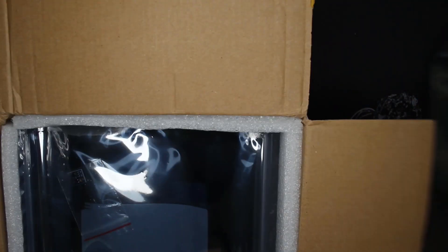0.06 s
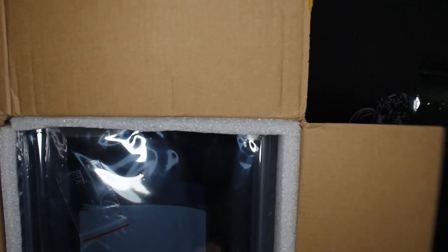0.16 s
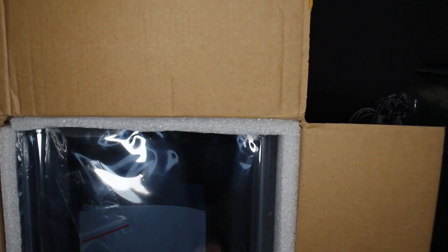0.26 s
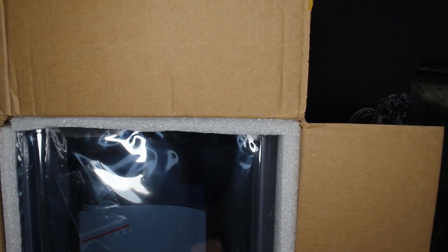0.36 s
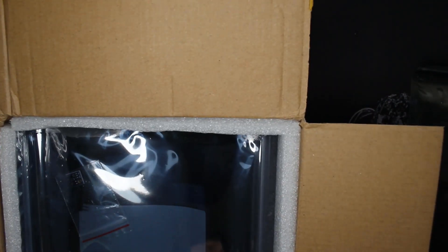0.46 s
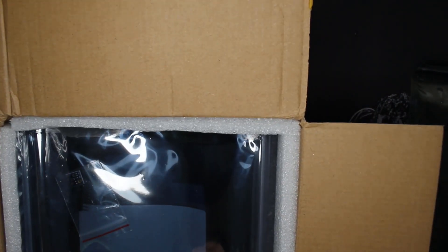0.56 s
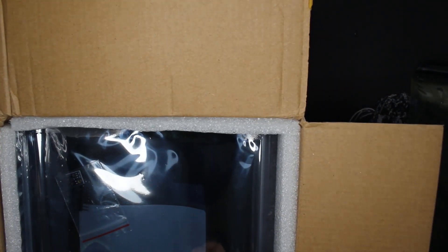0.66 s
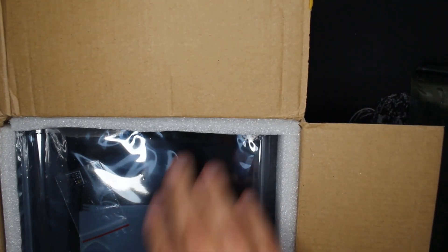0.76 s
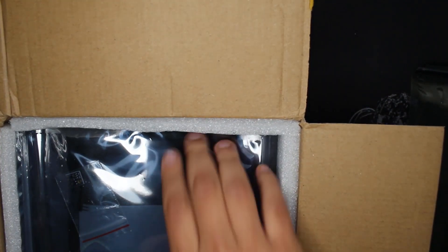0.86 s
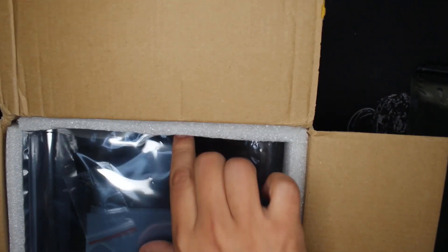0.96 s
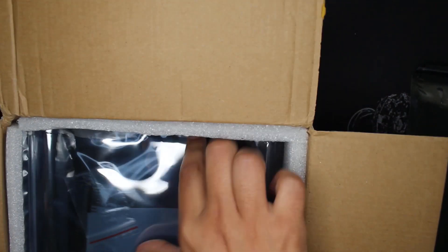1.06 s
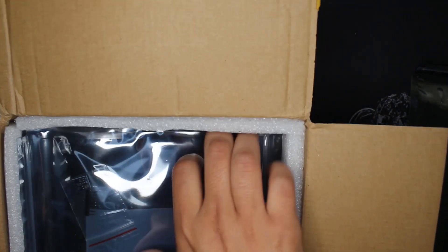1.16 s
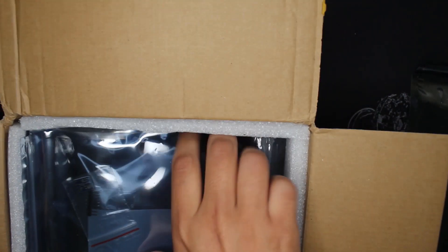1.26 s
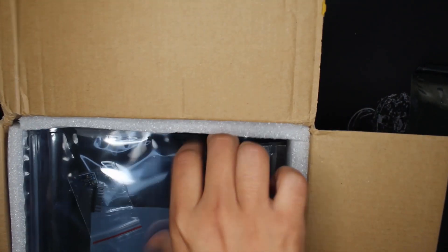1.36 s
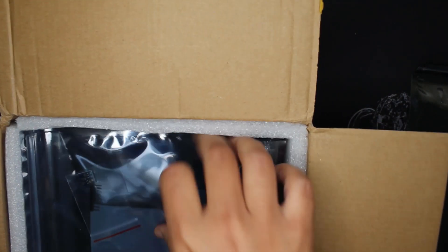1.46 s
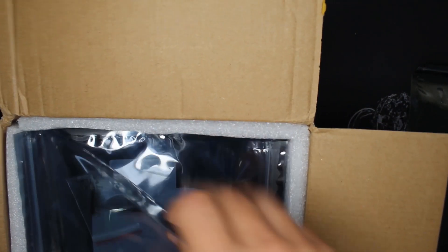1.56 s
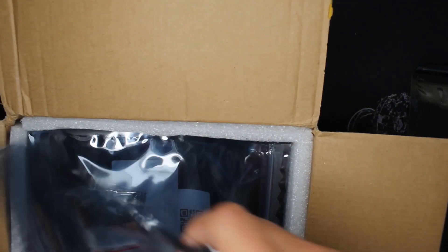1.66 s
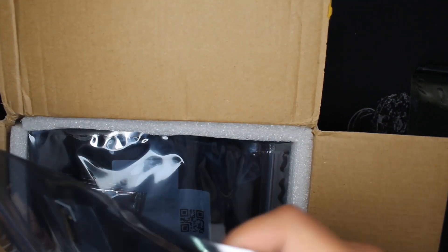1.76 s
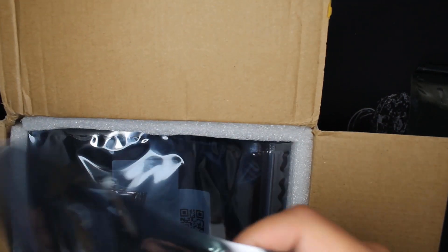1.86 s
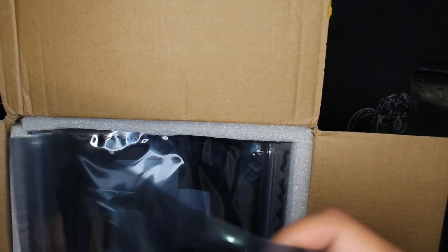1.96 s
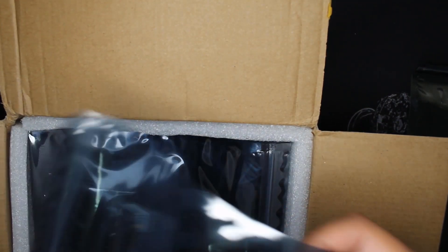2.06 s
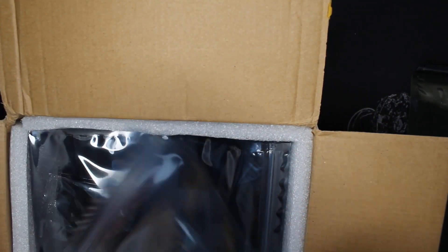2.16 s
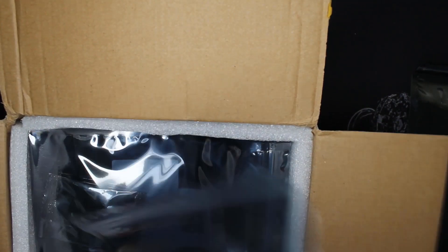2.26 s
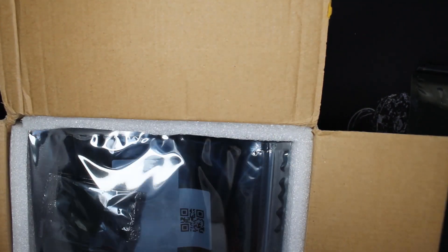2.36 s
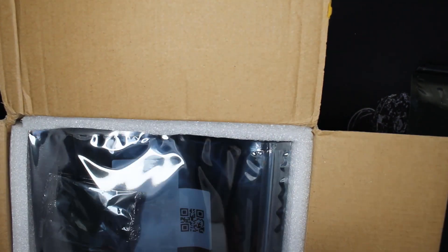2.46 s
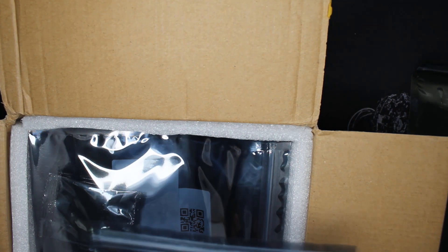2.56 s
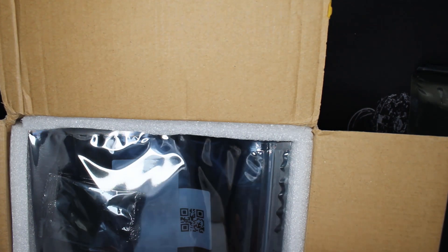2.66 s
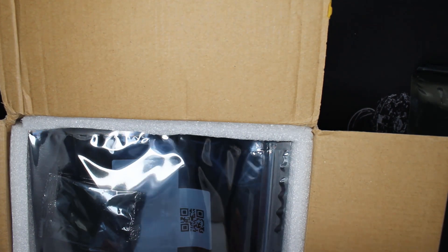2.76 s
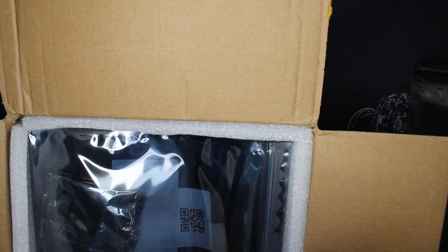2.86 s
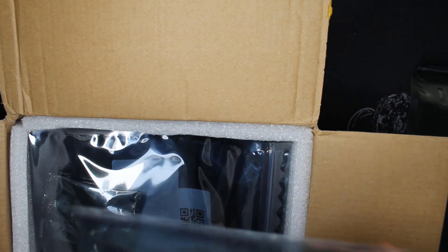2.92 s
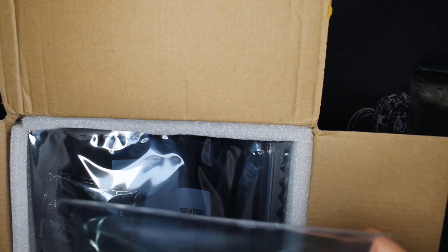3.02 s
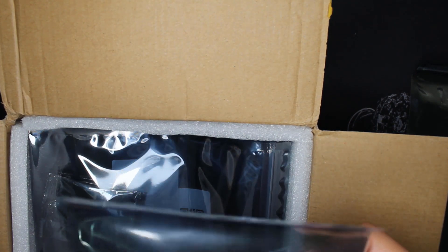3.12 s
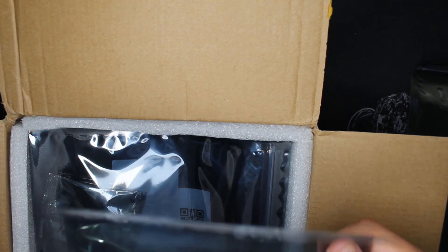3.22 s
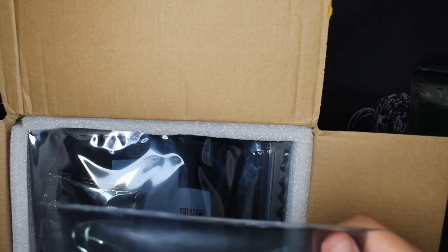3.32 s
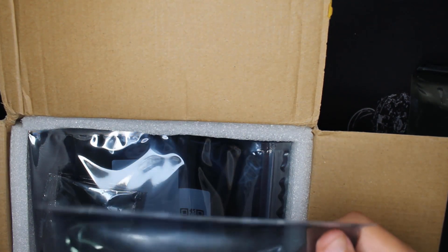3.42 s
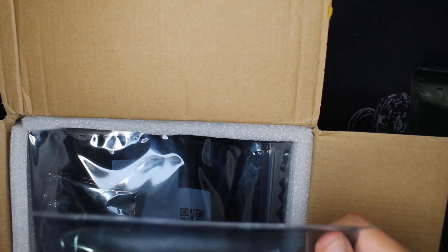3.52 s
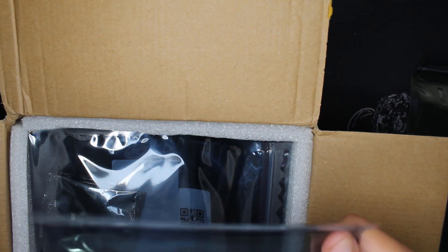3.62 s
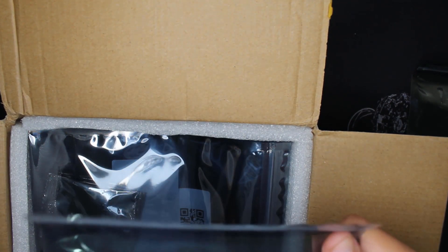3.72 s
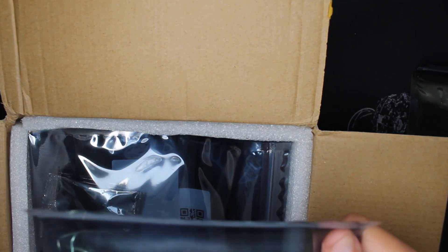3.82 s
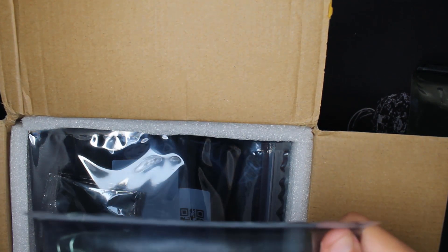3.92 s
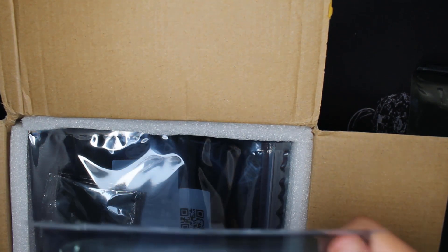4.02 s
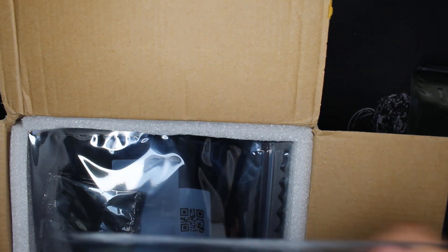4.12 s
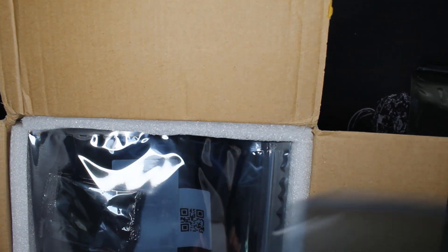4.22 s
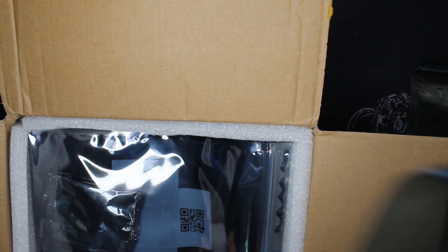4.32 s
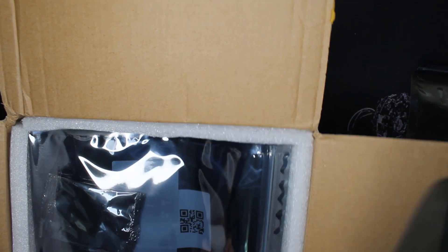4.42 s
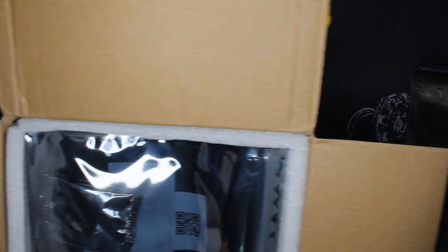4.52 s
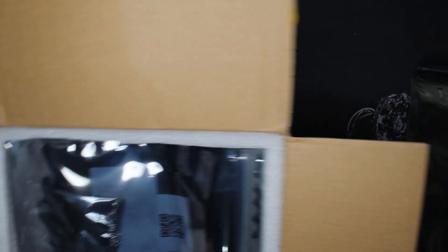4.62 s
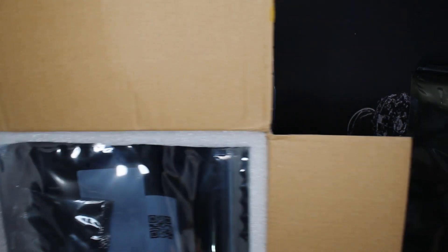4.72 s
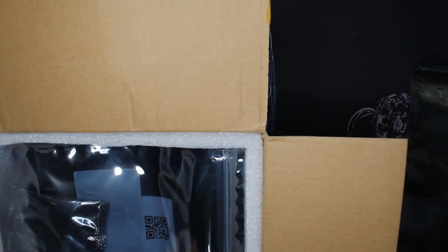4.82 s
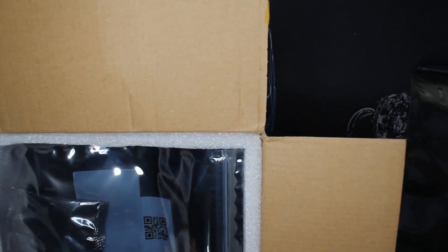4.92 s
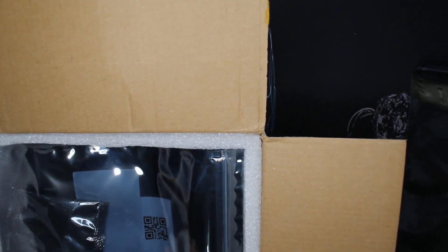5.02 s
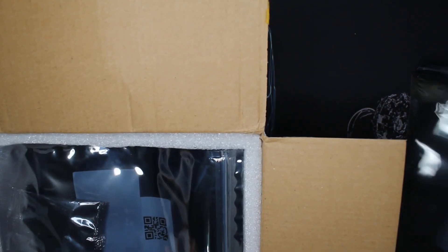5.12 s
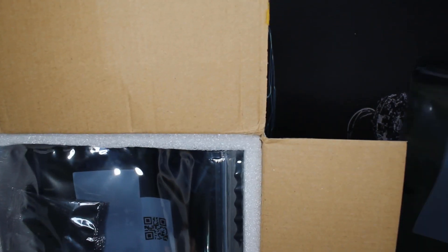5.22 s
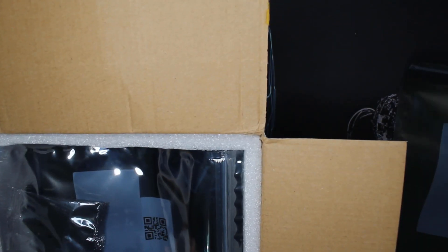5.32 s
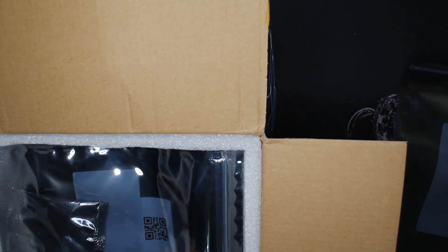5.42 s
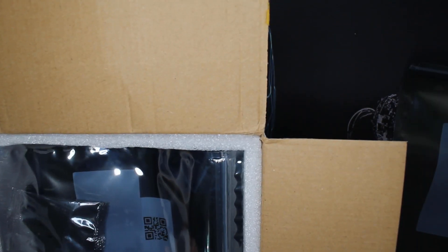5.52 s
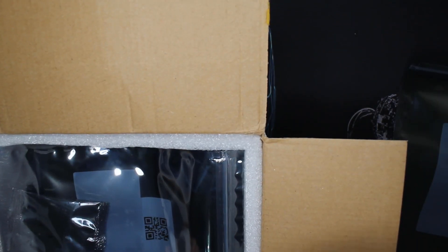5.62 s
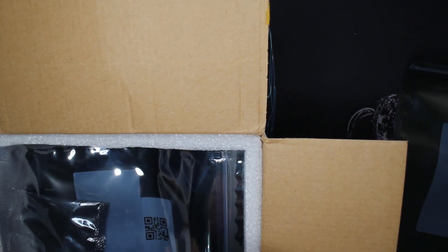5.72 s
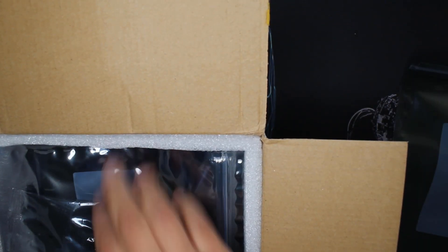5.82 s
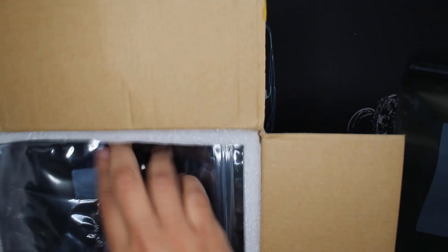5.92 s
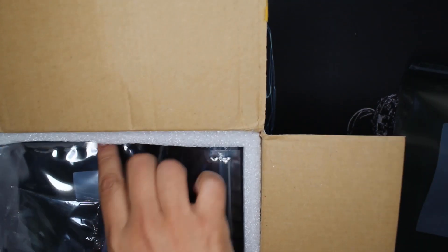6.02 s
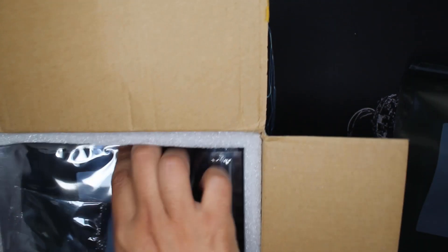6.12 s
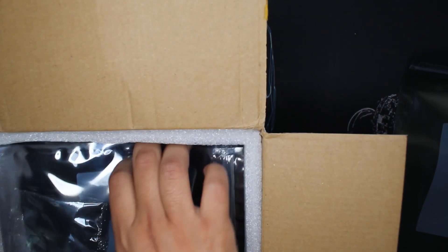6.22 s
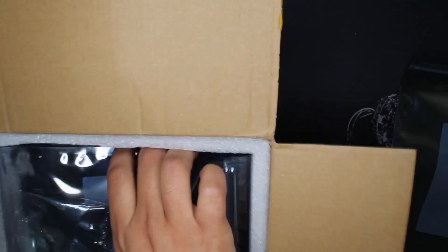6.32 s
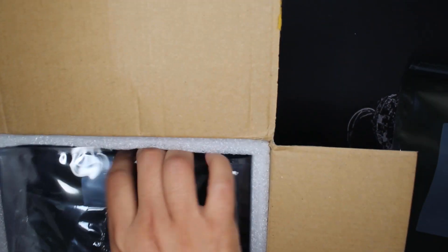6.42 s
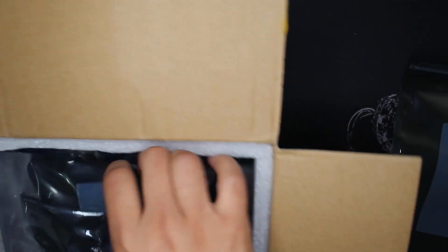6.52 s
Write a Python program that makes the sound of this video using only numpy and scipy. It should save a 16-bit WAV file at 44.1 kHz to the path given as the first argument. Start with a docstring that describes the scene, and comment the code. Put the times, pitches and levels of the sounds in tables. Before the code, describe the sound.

Stiff plastic bags crackle and rustle up close as they are gripped and lifted out of a cardboard box. The crinkling is busiest early, then drops to scattered ticks. The box shifts once over the table with a soft, slightly squeaky scrape before another flurry of crisp crinkles. Low handling thumps reach the microphone through the table, over the faint tone of a small room.

```python
"""Foil bags in a cardboard box

A hand pulls stiff foil-plastic bags out of a foam-lined box, close to the microphone in a small room.
Each crease snaps with one brief click, followed by a quick cluster of echoes from the box walls.
The film rustles and rings; the box booms softly and slides once over the table, hissing and squeaking.
Bumps travel through the table and reach the microphone as low rumble above a quiet room tone."""
import sys
import numpy as np
from scipy import signal
from scipy.fft import rfft, irfft, next_fast_len
from scipy.io import wavfile

SR = 44100
rng = np.random.default_rng(int(sys.argv[2]) if len(sys.argv) > 2 else 0)


def dump_mix(stems):
    """Bounce the given channels to the path in sys.argv[1] as a 16-bit WAV at rate SR."""
    frames = np.atleast_2d(stems).T  # one column per channel
    limited = np.clip(frames, -1, 1)  # hard clip at full scale
    pcm = np.round(limited * 32767).astype(np.int16)
    wavfile.write(sys.argv[1], SR, pcm)


N = 290178
T = np.arange(N) / SR

# snapping creases: (time [s], knock on the box [dB], film crack [dB], bright tick [dB], panel ring [Hz])
SNAPS = [(.0168, -28, -25, -50, 3080), (0.0331, -7, -15, -17.5, 4700), (0.042, -45, -7, -12, 1400),
         (0.0885, -14, -10.5, -27, 4810), (0.1208, -16.5, -13, -31, 3820), (0.2417, -40, -17.5, -52, 2400),
         (.4348, -51, -46, -35, 6900), (0.8365, -15, -18, -18, 6130), (.862, -19, -22.5, -40, 3250),
         (0.8999, -5.5, -17.5, -7, 7500), (0.9819, -19, -19.5, -37, 1670), (1.0123, -21, -25.5, -32, 6050),
         (1.0252, -46, -30, -25, 7900), (1.0531, -20.5, -26, -27, 5550), (1.1548, -22, -15, -17.5, 2440),
         (1.1884, -16, -9, -19, 2940), (1.2032, -18, -12, -28, 1700), (1.2692, -26, -34, -20, 6490),
         (1.3269, -10, -10, -13.5, 7800), (1.3961, -22, -6.5, -5, 6840), (1.424, -34, -11.5, -9, 6900),
         (1.4461, -10.5, -28, -7, 4500), (1.4548, -35, -29, -15, 6400), (1.4993, -16, -3, -16, 1700),
         (1.52, -31, -10, -21, 2920), (1.57, -21, -9.5, -8, 6100), (1.5817, -12, -25, -20, 2070),
         (1.6046, -20, -3, -10, 5570), (1.6288, -38, -24, -12, 3800), (1.636, -21, -10.5, -7, 4460),
         (1.7753, -32, -11.5, -16, 6500), (1.8479, -25, -42, -47, 4480), (1.9718, -15, -8, -10, 7500),
         (2.1621, -27.5, -31, -28.5, 1040), (2.2869, -37, -17, -29, 5400), (2.308, -17.5, -16.5, -26, 3540),
         (2.434, -24, -30, -56, 5130), (2.498, -30, -28.5, -54, 4290), (2.522, -33, -29, -52, 1750),
         (2.5698, -30.5, -5, -15.5, 7700), (2.592, -28, -18.5, -27, 2950), (2.689, -29, -30, -53, 1600),
         (2.7134, -33, -32, -34, 800), (2.74, -17.5, -3, 4.5, 7460), (2.868, -26, -19, -39, 3000),
         (3.0216, -23.5, -18, -22, 6900), (3.1017, -24, -24.5, -47, 900), (3.5726, -37, -32, -43.5, 936),
         (3.859, -18, -19, -48, 3200), (4.0019, -22.5, -21.5, -36.5, 970), (4.0088, -25, -30, -29.5, 2290),
         (4.2692, -33, -36.5, -41, 1400), (4.781, -40, -35, -50, 2700), (4.7884, -45, -35, -46, 5440),
         (4.9042, -47.5, -37.5, -62, 3120), (4.946, -53.5, -37.5, -51, 3230),
         (5.0555, -27.5, -25.5, -29.5, 1120), (5.0682, -27.5, -27, -31.5, 1420),
         (5.0985, -20, -19, -28, 2700), (5.1036, -19.5, -13.5, -12.5, 7350), (5.1169, -37, -11, -32, 2460),
         (5.2381, -34, -44, -33, 8160), (5.2784, -36, -37.5, -38.5, 7000), (5.4433, -31, -25, -21, 5390),
         (5.8348, -29.5, -36, -31, 6950), (5.8415, -33, -28.5, -28, 6970), (5.9173, -18, -16, -6.5, 11300),
         (6.0228, -32, -33, -37, 7080), (6.0484, -26, -25, -41, 5470), (6.334, -42, -27, -25, 6340),
         (6.3556, -4, -15.5, -13.5, 796), (6.4008, -18, -15, -21, 6150), (6.4676, -44, -26, -27, 6840),
         (6.5201, -7, -24, -25, 5170), (6.5269, -22, -14, -12.5, 6270), (6.5385, -24, -11.5, -14, 6640)]
# handling bumps: (time [s], level [dB], direction [push +1, pull -1], width [s])
BUMPS = [(0.038, -42, 1, 0.0049), (.72, -41, 1, 0.02), (0.831, -41, -1, 0.012), (0.923, -29.5, 1, 0.0059),
         (1.091, -41, 1, 0.0031), (1.197, -29, -1, 0.0048), (1.357, -34, 1, 0.0066),
         (1.404, -33, 1, 0.0026), (1.452, -35, -1, 0.0024), (1.506, -16.5, -1, 0.0046),
         (1.543, -41, 1, 0.0034), (1.585, -32, -1, 0.007), (1.653, -35, 1, 0.0027), (1.779, -32, 1, 0.0018),
         (1.98, -39, 1, 0.0028), (2.142, -30.5, -1, 0.0039), (2.327, -44, 1, 0.0038),
         (2.378, -31.5, 1, 0.0094), (2.684, -41, -1, 0.006), (2.719, -27.5, 1, 0.0097),
         (2.83, -34, 1, 0.015), (3.55, -36.5, 1, 0.019), (4.041, -33, -1, 0.0095),
         (5.111, -42.5, 1, 0.0033), (5.853, -22.5, -1, 0.0069), (5.894, -33, -1, 0.013),
         (5.926, -31, 1, 0.0044), (5.962, -45, 1, 0.0059), (6.028, -38, -1, 0.017), (6.14, -48, 1, 0.016),
         (6.284, -37, 1, 0.01), (6.41, -41, -1, .012), (6.554, -25, 1, 0.011)]
# limits of a crease's knock, body, crack, tick and air bands: (frequency [Hz])
BAND_EDGES_HZ = [400, 750, 1800, 5000, 9000, 16000]


def from_db(db):
    """Amplitude ratio of a level in decibels."""
    return 10 ** (np.asarray(db) / 20)


def unit_rms(x):
    """Normalisation to unit mean power."""
    return x / np.sqrt(np.mean(x ** 2) + 1e-20)


def band(x, low_hz, high_hz):
    """Butterworth band-pass filtering."""
    return signal.sosfilt(signal.butter(2, [low_hz, high_hz], "band", fs=SR, output="sos"), x + 1e-18)


def coloured(x, spectrum):
    """Spectral shaping by a curve of (frequency [Hz], level [dB]), at unit rms."""
    hz, level_db = np.transpose(spectrum)
    size = next_fast_len(N)
    bin_hz = np.arange(size // 2 + 1) * SR / size + 1
    gain = from_db(np.interp(np.log(bin_hz), np.log(hz), level_db))
    return unit_rms(irfft(rfft(x, size) * gain, size)[:N])


def drift(corner_hz):
    """Random modulation: low-passed noise of about unit rms."""
    steps_per_s = 200
    steps = rng.standard_normal(int(N / SR * steps_per_s) + 2)
    pole = np.exp(-2 * np.pi * corner_hz / steps_per_s)
    slow = signal.lfilter([1], [1, -2 * pole, pole * pole], steps)
    return np.interp(T * steps_per_s, np.arange(len(slow)), unit_rms(slow))


def resonator(x, hz, t60):
    """Damped harmonic oscillator: a unit impulse starts a decaying sine of amplitude 1."""
    r, w = from_db(-60 / (t60 * SR)), 2 * np.pi * hz / SR
    return signal.lfilter([0, np.sin(w)], [1, -2 * r * np.cos(w), r * r], x + 1e-18)


def noise_floor(noise_db=-66):
    """Stationary noise of room and microphone, with faint tones that waver in level."""
    # room tone and microphone hiss: (frequency [Hz], relative density [dB])
    spectrum = [(59, -64.5), (100, -6.5), (163, 0.5), (207, -27.5), (235, -3.5), (368, -5), (446, -16.5),
                (507, -10), (778, -15), (1030, -14), (2360, -22), (14500, -27.5), (16500, -38)]
    # steady-pitched hum: (frequency [Hz], median rms level [dB])
    hum = [(120, -71), (242, -84.5), (1001, -86)]
    tones = sum(from_db(db + 4 * drift(2.2)) * np.sqrt(2) * np.sin(2 * np.pi * hz * T) for hz, db in hum)
    return from_db(noise_db) * coloured(rng.standard_normal(N), spectrum) + tones


def room(x, first_wall_s=0.0082):
    """Reverberation: diffuse echoes follow the first wall reflection, each band at its own decay rate."""
    # octave bands of the echoes: (centre [Hz], gain [dB], t60 [s])
    octaves = [(320, 2.5, 0.11), (730, -7, 0.16), (1520, -10.5, 0.42), (2920, -9, 0.4), (4700, -13, 0.23),
               (7700, -8.5, 0.39), (12000, -13.5, 0.27)]
    age = np.arange(SR // 2) / SR
    response = 0
    for hz, db, t60 in octaves:
        tail = band(rng.standard_normal(len(age)), hz / 1.4, min(hz * 1.4, 17000))
        tail *= from_db(-60 * age / t60)
        bandwidth_hz = .69 * hz
        response += from_db(db) * tail / np.sqrt(np.sum(tail ** 2) * SR / 2 / bandwidth_hz)
    delay = np.zeros(round(first_wall_s * SR))
    return signal.fftconvolve(x, np.r_[delay, response])[:N]


def shudder(relative_db, half_width_s):
    """Amplitude envelope of the vibration around each bump: a Gaussian swell."""
    return sum(from_db(db + relative_db) * np.exp(-((T - s) / half_width_s) ** 2) for s, db, *_ in BUMPS)


def rumble():
    """Structure-borne sound: lumpy low noise and single soft bumps carried through the table."""
    # handling rumble between the bumps: (time [s], deep band [dB], low band [dB])
    levels = [(0.0, -60, -49), (0.44, -60, -66.5), (1.52, -45.5, -46.5), (1.89, -54, -58),
              (2.09, -61, -54.5), (2.29, -43.5, -55.5), (2.46, -47, -60.5), (2.67, -52, -65.5),
              (3.11, -56, -56), (3.54, -52.5, -68), (4.07, -52.5, -64.5), (4.82, -61, -60),
              (5.77, -56.5, -65), (5.99, -47.5, -56.5), (6.27, -53, -59.5), (6.58, -47, -58)]
    times, *columns = np.transpose(levels)
    deep_gain, low_gain = (from_db(np.interp(T, times, db, left=-120, right=-120)) for db in columns)
    deep_gain += shudder(relative_db=-13.5, half_width_s=0.031)
    low_gain += shudder(relative_db=-20.5, half_width_s=0.013)
    deep = deep_gain * unit_rms(band(rng.standard_normal(N), 9.24, 43.8))
    low = low_gain * unit_rms(band(rng.standard_normal(N), 53, 188.7)) * from_db(2 * drift(25))
    lumps = from_db(3 * drift(7))   # both bands swell and sink together
    pulses, age = np.zeros(N + 2000), np.arange(-1000, 1000) / SR
    for s, db, direction, width in BUMPS:
        at = round(s * SR)
        pulses[at - 1000:at + 1000] += direction * from_db(db) * np.exp(-(age / (0.55 * width)) ** 2)
    bumps = band(pulses[:N], 6.2, 400)   # the filter's overshoot makes each bump spring back
    return (deep + low) * lumps + bumps


def slide(level_db=-52, start_s=4.333, fastest_s=4.603, stop_s=4.842):
    """Friction noise follows the box's speed; its reflection in the table top acts as a comb filter."""
    # friction hiss: (frequency [Hz], relative density [dB])
    spectrum = [(290, -12), (500, -3.5), (924, -10.5), (1330, -9.5), (2040, -12), (2460, -5.5),
                (4360, -6.5), (5000, -4.5), (5840, -5), (7500, -10), (15100, -18.5), (16500, -38)]
    # what the table top reflects: (frequency [Hz], relative density [dB])
    echo_spectrum = [(600, -18), (2500, -19), (5800, 7), (8500, -6.5), (16000, -27)]
    echo_gain, echo_delay_s = 0.11, .0012
    hiss = rng.standard_normal(N) * from_db(1.25 * drift(40))
    echo = echo_gain * np.roll(coloured(hiss, echo_spectrum), round(echo_delay_s * SR))
    progress = np.interp(T, [start_s, fastest_s, stop_s], [0, .5, 1])
    swell = np.abs(np.sin(np.pi * progress)) ** 1.44
    return from_db(level_db) * swell * coloured(hiss + echo, spectrum)


def squeaks(rise_s=0.0065):
    """Stick-slip friction: the slowing box catches on the table in short, rough tones."""
    # box catching as it slides: (time [s], frequency [Hz], level [dB], t60 [s])
    catches = [(4.612, 1330, -44, .03), (4.628, 1310, -42, 0.043), (4.69, 1290, -43, 0.055),
               (4.741, 1080, -50.5, 0.1)]
    tones, age = np.zeros(N), T[:SR // 10]
    for s, hz, db, t60 in catches:
        at = round(s * SR)
        envelope = from_db(db - 60 * age / t60) * np.tanh(age / rise_s)
        tones[at:at + len(age)] += envelope * np.sin(2 * np.pi * hz * age)
    roughness = from_db(3.7 * drift(60))
    return tones * roughness


def box(x, coupling_db=-31.5):
    """Modal resonance: the hollow box rings briefly with whatever crackles in it."""
    # air and wall modes: (frequency [Hz], relative level [dB], t60 [s])
    modes = [(361, -1.5, 0.075), (504, 0, 0.0875), (610, -2, 0.069), (695, -10, 0.014), (780, -24.5, 0.015),
             (1062, -10.5, 0.023), (1396, -7.5, 0.034)]
    ringing = sum(from_db(db) * resonator(x, hz, t60) * 2 * np.pi * hz / SR for hz, db, t60 in modes)
    return from_db(coupling_db) * ringing


def grip_gains(rise_db_per_s=403.5, fall_db_per_s=108.5):
    """Incoherent sources add in power: grips rise, hold and fade in the middle, dull and bright bands."""
    # fingers pressing or dragging the film: (time [s], hold [s], middle [dB], dull [dB], bright [dB])
    grips = [(0.044, 0.031, -44.5, -47, -62), (0.234, 0.019, -64, -74.5, -82),
             (0.842, .03, -59.5, -74, -61), (0.9, 0.0091, -53.5, -52, -53),
             (1.02, 0.088, -59.5, -59.5, -61), (1.192, 0.041, -50, -55.5, -62),
             (1.325, 0.056, -58, -57, -67), (1.403, 0.045, -44, -65, -53), (1.55, 0.054, -45, -49, -63),
             (1.793, 0.0079, -58, -64, -63), (2.03, 0.061, -64.5, -59, -66), (2.15, 0.15, -61, -71, -64),
             (2.275, 0.015, -59, -68, -64), (2.46, 0.16, -67, -69, -74), (2.763, .01, -50.5, -77, -62),
             (2.99, .03, -68, -76, -83), (3.88, 0.064, -81, -67, -99), (4.041, 0.042, -57, -66.5, -66),
             (4.232, 0.15, -75, -70, -74), (4.853, 0.22, -77, -73.5, -88), (5.133, 0.0081, -50, -70, -77),
             (5.46, .01, -70, -72, -83), (5.829, .04, -64.5, -64, -62), (5.922, 0.0092, -50.5, -57, -61),
             (6.04, 0.085, -64, -59, -65), (6.14, 0.046, -65.5, -71, -67), (6.246, 0.018, -59.5, -67, -65),
             (6.37, 0.023, -57, -52.5, -65), (6.535, .04, -42.5, -45, -49)]
    t = np.arange(N // 64 + 1) * 64 / SR
    power = np.zeros((3, len(t)))
    for s, hold, *band_db in grips:
        loss_db = rise_db_per_s * np.maximum(s - t, 0) + fall_db_per_s * np.maximum(t - s - hold, 0)
        power += from_db(np.array(band_db)[:, None] - loss_db) ** 2
    return [np.interp(T, t, np.sqrt(p)) for p in power]


def rustle(clicks_per_s=3000, spread_db=3, clump_db=4, hiss_gain=0.49):
    """Shot noise: countless small creases click at random, in clumps of loudness, over a soft hiss."""
    # rustling film: (frequency [Hz], relative density [dB])
    spectrum = [(150, -28), (250, -17.5), (438, -12), (570, -3), (1130, -10.5), (1350, -11.5),
                (6400, -16.5), (13600, -23), (16500, -7.5)]
    sizes = from_db(spread_db * np.minimum(rng.exponential(1, N), 3.5)) * rng.choice([-1, 1], N)
    clicks = sizes * (rng.random(N) < clicks_per_s / SR)
    grains = unit_rms(clicks * from_db(clump_db * np.tanh(drift(25))))
    film = coloured(grains + hiss_gain * rng.standard_normal(N), spectrum)
    middle, dull, bright = grip_gains()
    return (dull * unit_rms(band(film, 250, 1500))
            - middle * unit_rms(band(film, 1500, 9000))   # inverted to add at the crossovers
            + bright * unit_rms(band(film, 9000, 16000)))


def panels(cycles_per_t60=18, relative_db=-6.5):
    """Free vibration: the panel of film beside each snapping crease rings briefly at its own pitch."""
    rings, age = np.zeros(N + 2048), T[:2048]
    for s, _, crack_db, tick_db, hz in SNAPS:
        tone = np.sin(2 * np.pi * hz * age) * from_db(-60 * age * hz / cycles_per_t60)
        gain = from_db(max(crack_db, tick_db) + relative_db)
        at = round(s * SR)
        rings[at:at + len(age)] += gain * tone / np.linalg.norm(tone)
    return rings[:N]


def filter_bank(trains):
    """Band synthesis from one pulse train a band; alternating signs make neighbours add at crossovers."""
    bands = zip(trains, BAND_EDGES_HZ, BAND_EDGES_HZ[1:])
    return sum((-1) ** k * band(x, low, high) * np.sqrt(SR / 2 / (3.46 * (high - low)))
               for k, (x, low, high) in enumerate(bands))


def echo_trains(events, envelopes, lead_samples=0, top_fade=1, echoes_per_s=7000):
    """Early reflections arrive at random under each envelope, by band; also bare clicks of equal energy."""
    span = envelopes.shape[1]
    chance, size = rng.random((len(events), 2, span)).transpose(1, 0, 2)
    clusters = (chance < echoes_per_s / SR) * (2 * size - 1) * envelopes
    clusters[:, 0] = 0.67 * envelopes[:, 0]   # a snap's direct click
    clusters /= np.linalg.norm(clusters, axis=1, keepdims=True)
    tops = clusters * top_fade   # for the tick and air bands
    tops /= np.linalg.norm(tops, axis=1, keepdims=True)
    trains, clicks = np.zeros((2, len(BAND_EDGES_HZ) - 1, N + span))
    for (s, knock_db, crack_db, tick_db, _), cluster, top in zip(events, clusters, tops):
        body_db, air_db = (knock_db + crack_db) / 2 - 2, tick_db - 2
        gains = from_db([knock_db, body_db, crack_db, tick_db, air_db])
        at = min(round(s * SR), N - 1) - lead_samples
        trains[:, at:at + span] += gains[:, None] * np.array([cluster] * 3 + [top] * 2)
        clicks[:, at + lead_samples] += gains
    return trains[:, :N], clicks[:, :N]


def creases(echo_t60_s=0.029, top_fade_t60_s=0.036):
    """Buckling: a crease snaps with one click, then echoes off the box walls; crumples swell and fade."""
    # soft crumples: (middle time [s], knock [dB], crack [dB], tick [dB], length before limiting [s])
    crumples = [(.053, -21, -8, -16, 0.021), (0.097, -29, -10, -21.5, 0.012),
                (.151, -40, -21, -25.5, 0.0082), (0.923, -30, -22, -20, .011),
                (1.377, -15.5, -16, -17, 0.0078), (1.404, -10, -18, -10.5, 0.0043),
                (1.536, -20, -13, -15.5, .015), (1.56, -10, -16, -11, 0.0083),
                (1.585, -12, -12, -16, 0.0046), (1.669, -28, -20, -16.5, 0.0097),
                (2.087, -21, -30, -31.5, 0.0081), (2.239, -34, -18.5, -29, 0.017),
                (2.32, -28, -13.5, -28, 0.0083), (2.381, -21.5, -29, -49, 0.0062),
                (3.275, -50.5, -38.5, -44.5, 0.0083), (4.057, -40, -36, -31, .015),
                (5.204, -54, -21.5, -40, 0.01), (5.849, -35, -36, -19.5, .03),
                (5.896, -22.5, -33, -16, 0.0098), (5.93, -19.5, -26, -17, 0.0097),
                (6.031, -20.5, -28, -15, 0.013), (6.246, -23.5, -30, -29, 0.064),
                (6.281, -25, -38, -33, 0.0099), (6.494, -20, -18.5, -22, 0.021),
                (6.553, -10.5, -6, -6.5, 0.016), (6.571, -21, -16, -6, 0.027)]
    age, middle = T[:2048], 1024
    decays = np.tile(from_db(-60 * age / echo_t60_s), (len(SNAPS), 1))
    top_fade = from_db(-60 * age / top_fade_t60_s)   # extra decay: the tick is shorter than the crack
    snaps, snap_clicks = echo_trains(SNAPS, decays, top_fade=top_fade)
    half_widths_s = np.clip(np.array(crumples)[:, -1:], .002, .03) / 2
    gaussians = np.exp(-((age - middle / SR) / half_widths_s) ** 2)
    swells, swell_clicks = echo_trains(crumples, gaussians, lead_samples=middle)
    return filter_bank(snaps + swells), filter_bank(snap_clicks + swell_clicks)


def scene():
    """Superposition of the film's sound, the box, the room's echoes and the background."""
    crackle, bare_clicks = creases()
    rings = panels()
    fine_rustle = rustle()
    echoes = room(bare_clicks + rings)
    boom = box(from_db(8.5) * crackle + fine_rustle)   # blows ring the box more than the rustle does
    bags = crackle + rings + fine_rustle
    return (bags + boom + echoes + slide() + squeaks() + rumble() + noise_floor())[None]


def record(dry):
    """Frequency response of the microphone: treble peaks and a dip, a roll-off, then a steep cut."""
    # peaks and dip of the capsule: (centre [Hz], width [Hz], gain [dB])
    capsule = [(6900, 1200, 2.5), (9630, 2200, -2.5), (12260, 3400, 2.5)]
    for hz, width, db in capsule:
        w, gain = 2 * np.pi * hz / SR, from_db(db / 2)
        damping = np.sin(w) * width / hz / 2
        numerator = [1 + damping * gain, -2 * np.cos(w), 1 - damping * gain]
        denominator = [1 + damping / gain, -2 * np.cos(w), 1 - damping / gain]
        dry = signal.lfilter(numerator, denominator, dry)
    rolled_off = signal.sosfilt(signal.butter(6, 16000, fs=SR, output="sos"), dry)
    return signal.sosfilt(signal.cheby2(12, 80, 17000, fs=SR, output="sos"), rolled_off)


dry = scene()
out = record(dry)
dump_mix(out)
```